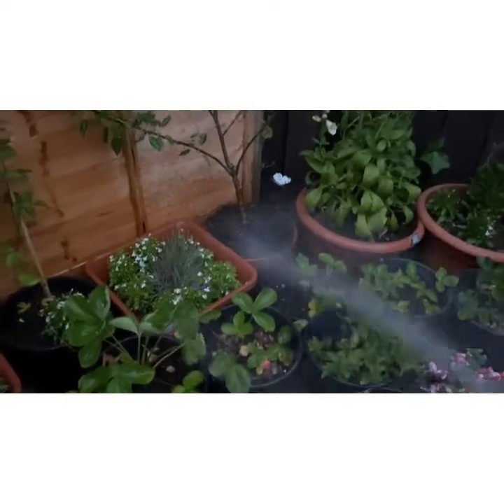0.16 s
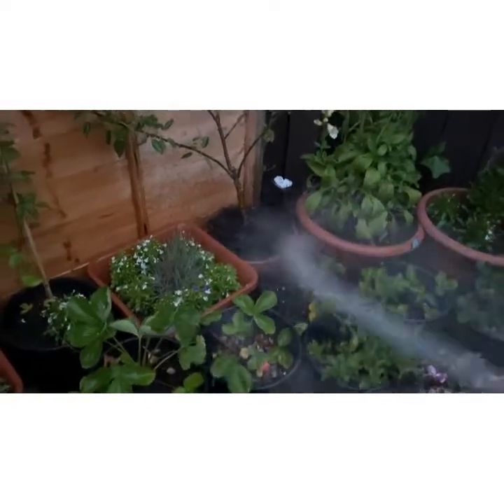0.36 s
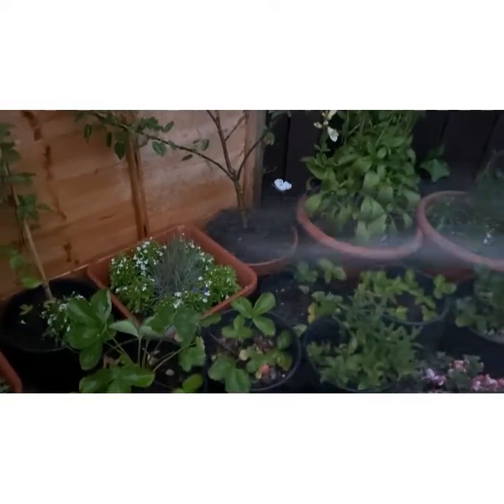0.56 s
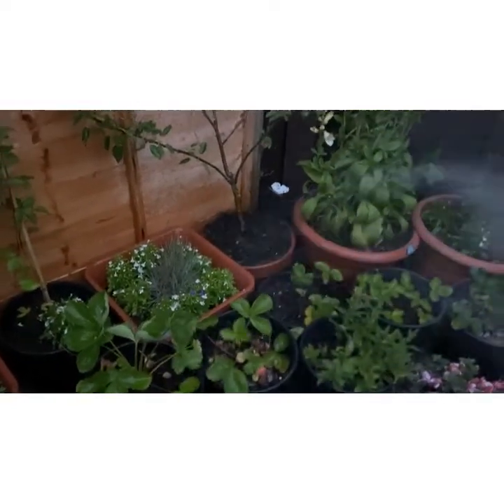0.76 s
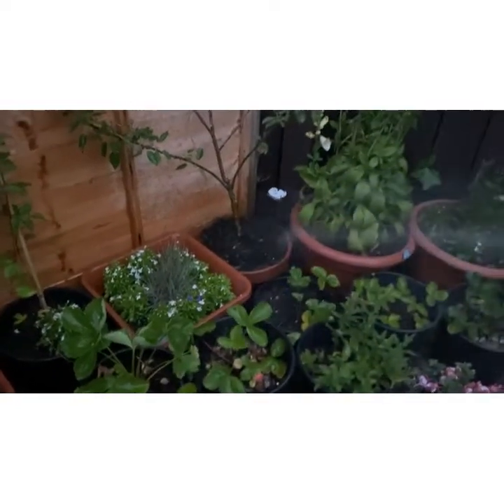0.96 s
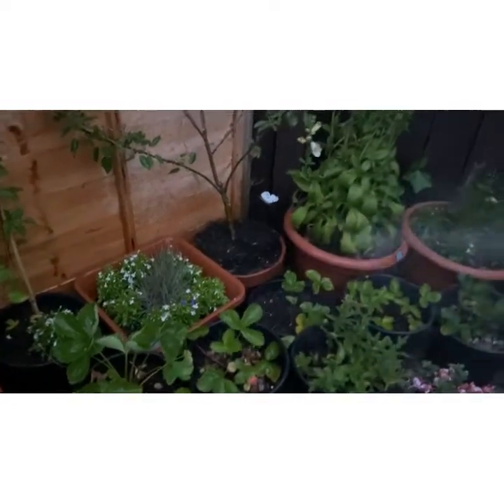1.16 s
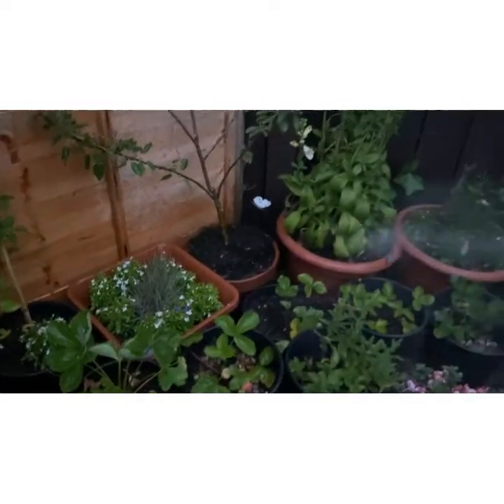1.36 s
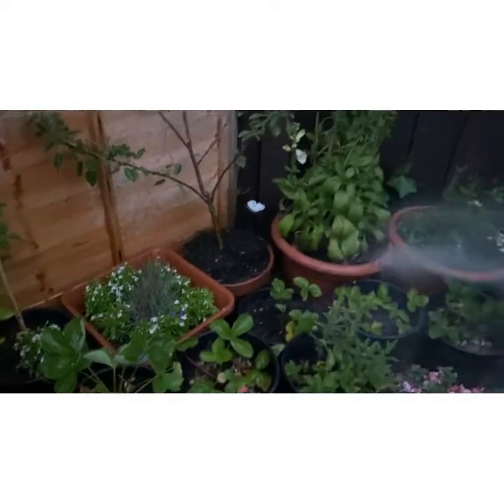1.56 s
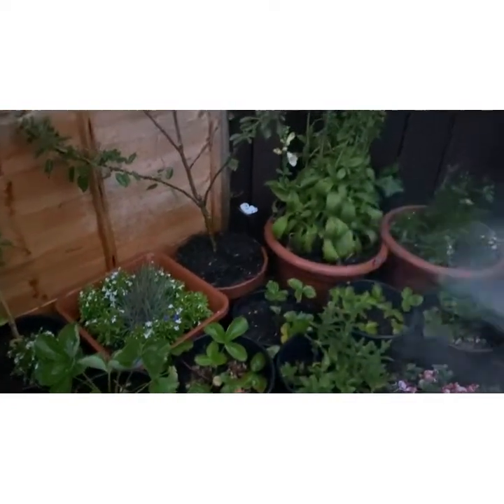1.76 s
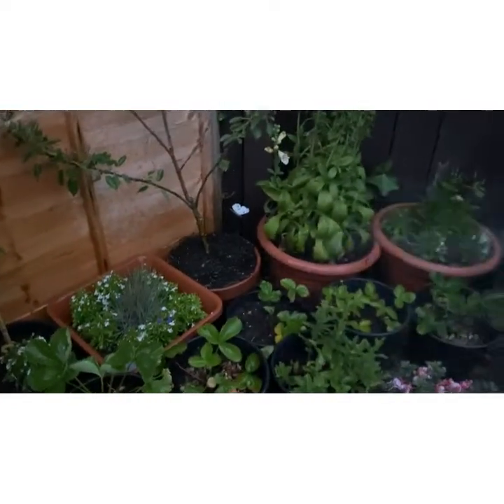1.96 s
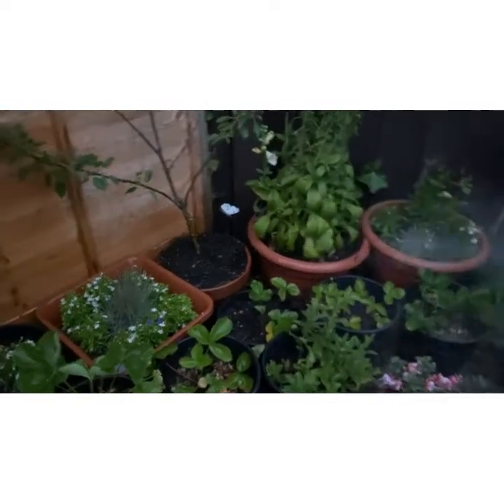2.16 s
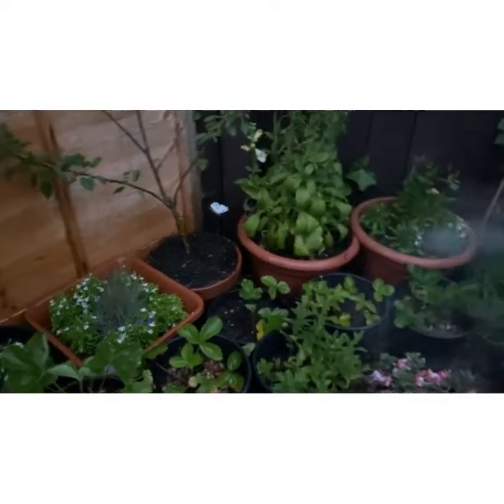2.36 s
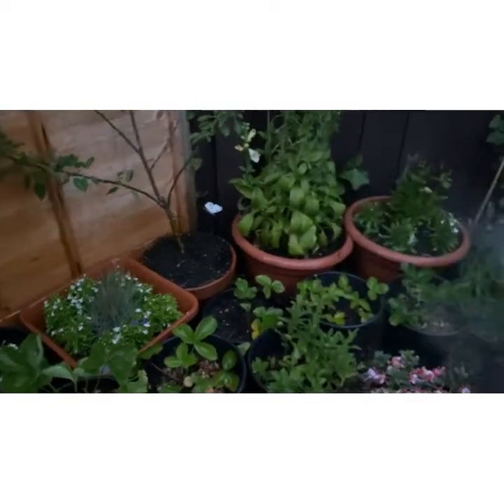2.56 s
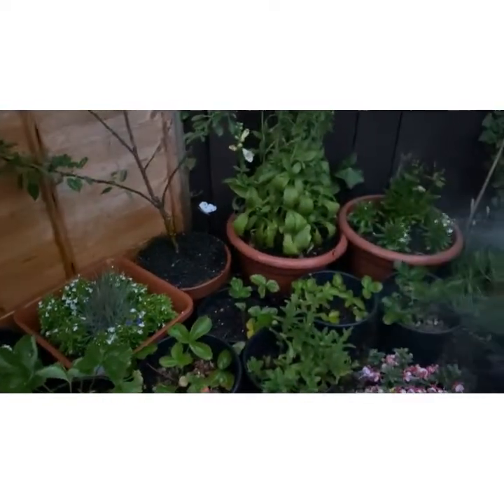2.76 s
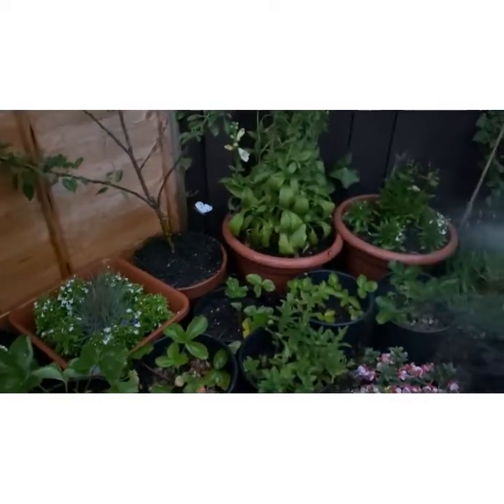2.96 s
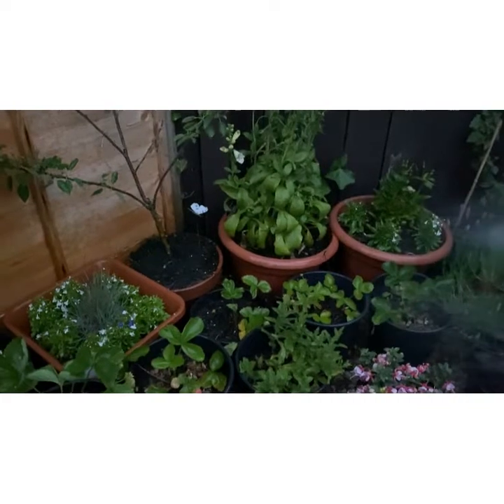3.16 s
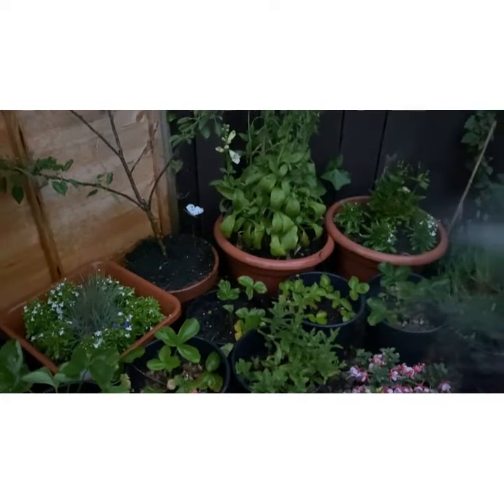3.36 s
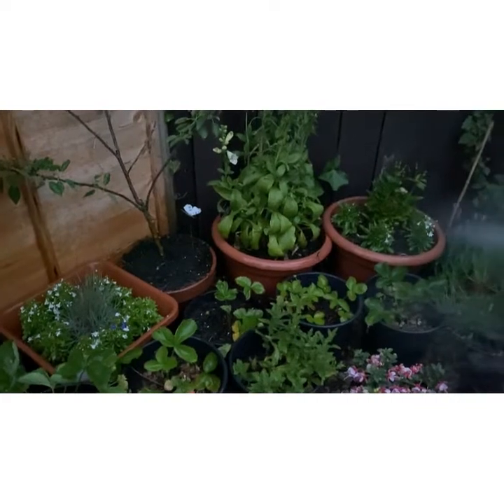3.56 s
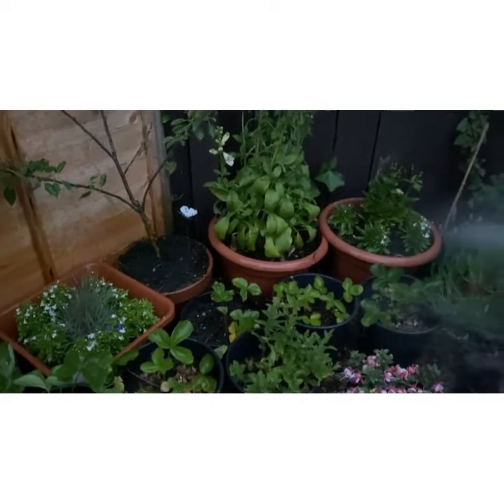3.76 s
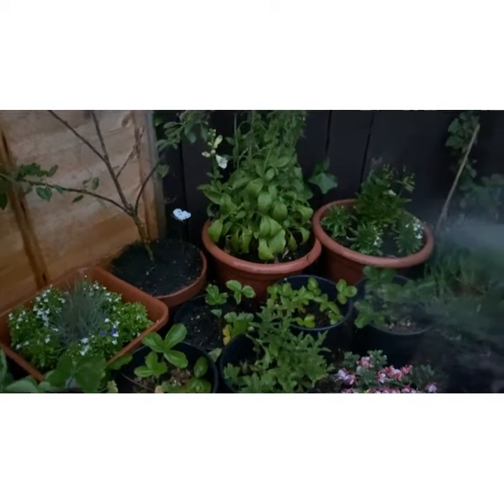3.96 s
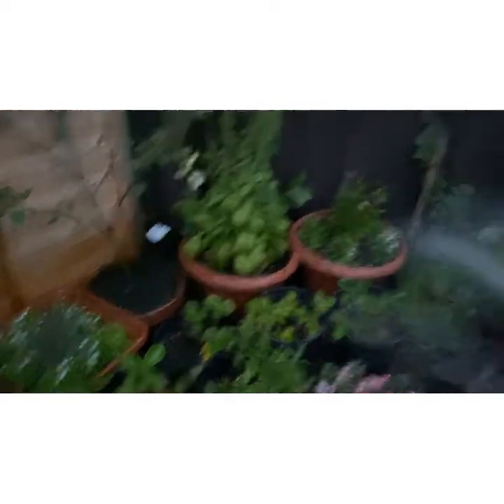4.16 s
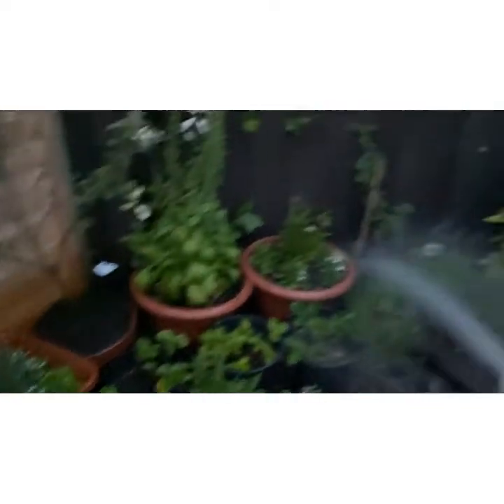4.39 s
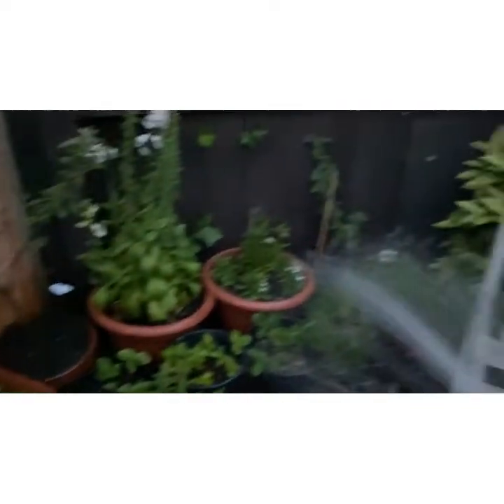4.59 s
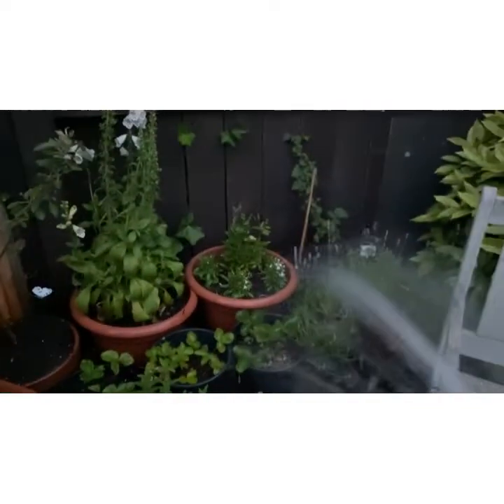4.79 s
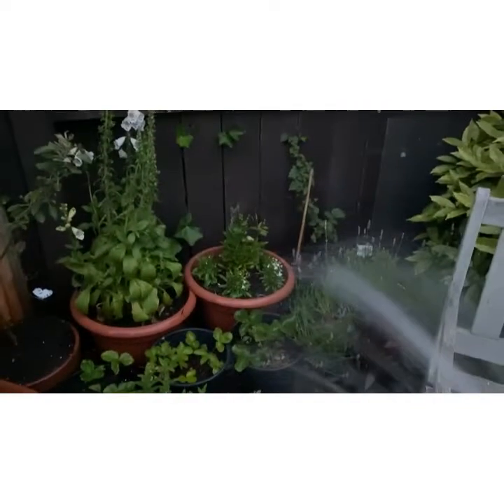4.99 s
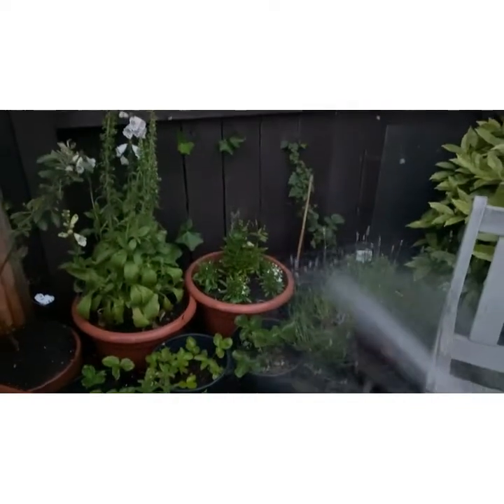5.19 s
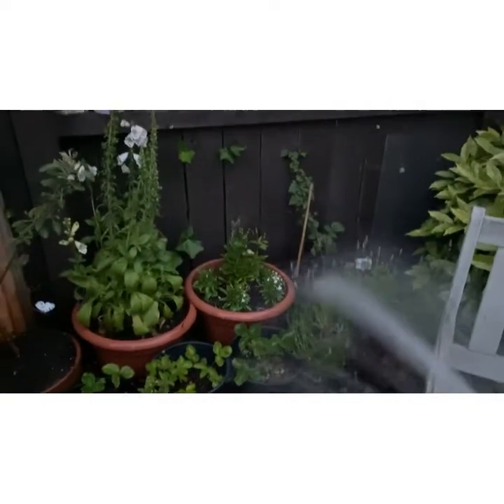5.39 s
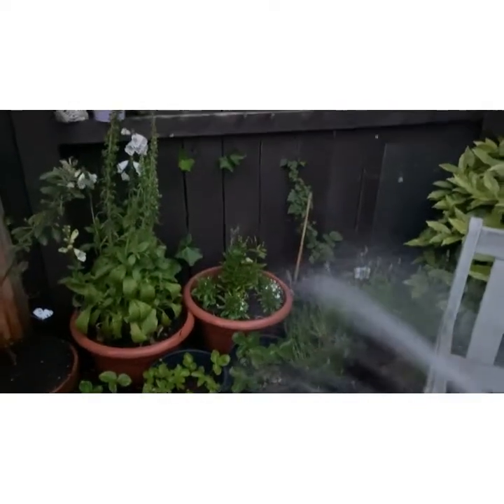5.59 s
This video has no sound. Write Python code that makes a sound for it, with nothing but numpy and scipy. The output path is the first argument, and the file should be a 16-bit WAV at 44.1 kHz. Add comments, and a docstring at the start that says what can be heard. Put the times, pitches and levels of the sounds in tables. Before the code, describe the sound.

In a fenced garden corner, heard from a handheld device near the spray, water hisses and patters on leaves and soil. Bright wet slaps pulse through the first two seconds, the middle is quieter and thinner with crisp ticking drops, and the last part turns hollow and ringing as the jet drums on pots. The water is still running at the end.

```python
"""In the corner of a wooden fence, a garden hose sprays potted plants, close to a phone.
Thousands of drops, made from random clicks shaped by filters, patter on leaves and thud on soil.
Fine mist hisses and sizzles; the jet, a dense shower that swells and fades, swishes across leaves.
Pots and a tub ring in narrow bands; single drops, each a short fading tone, plop, smack and tick.
Low rumble and a faint hum lie behind the water."""
import sys
import numpy as np
from scipy import signal
from scipy.fft import rfft, irfft, next_fast_len
from scipy.io import wavfile
from scipy.ndimage import uniform_filter1d, map_coordinates

SR = 44100
rng = np.random.default_rng(int(sys.argv[2]) if len(sys.argv) > 2 else 0)


def inscribe(sig):
    """Save sig as 16-bit PCM at rate SR to the path in sys.argv[1].

    A 1-D sig is mono; a 2-D sig holds one channel per row.
    Samples are clipped to [-1, 1] before scaling.
    """
    pcm = np.round(np.clip(np.atleast_2d(sig).T, -1, 1) * 32767)
    wavfile.write(sys.argv[1], SR, pcm.astype(np.int16))


N = 248283
T = np.arange(N) / SR
SIZE = next_fast_len(N + 8192)
FREQ = np.maximum(np.arange(SIZE // 2 + 1) * SR / SIZE, 1)


def undb(db):
    """Turn decibels into a gain."""
    return 10 ** (np.asarray(db) / 20)


def unit(x):
    """Scale a sound to rms 1."""
    return x / np.sqrt(np.mean(x ** 2))


def curve(rows):
    """Draw a (t/s, value) table as a line with a value at every sample."""
    return np.interp(T, *np.transpose(rows))


def spectrum(points):
    """Draw an (f/Hz, level/dB) table as a line over all frequencies, even in octaves."""
    hz, db = np.transpose(points)
    return np.interp(np.log(FREQ), np.log(hz), db)


def filtered(x, gain):
    """Multiply each frequency of a sound by its own gain."""
    return irfft(rfft(x, SIZE) * gain, SIZE)[..., :N]


def resonance(hz, width):
    """Response of one damped ringing mode, gain 1 at its centre."""
    return 1 / (1 + 1j * (FREQ / hz - hz / FREQ) * hz / width)


def walk(rate):
    """A wandering value of rms 1: random levels held for 1 / rate seconds, then smoothed."""
    held = rng.standard_normal(2048)[(T * rate).astype(int) % 2048]
    return unit(uniform_filter1d(held, max(int(SR / rate), 1)))


def swell(start, hold, rise, decay):
    """An envelope that swells up to a moment, holds and dies away."""
    before = np.maximum(start - T, 0)
    after = np.maximum(T - start - hold, 0)
    return np.exp(-(before / rise) ** 2 - after / decay)


def with_swells(steady_db, rows, rise, decay):
    """Gain of a steady level with (t/s, hold/s, level/dB) swells on top; their powers add."""
    swell_power = sum((undb(db) * swell(s, hold, rise, decay)) ** 2 for s, hold, db in rows)
    return np.sqrt(undb(steady_db) ** 2 + swell_power)


def add(out, start, sound):
    """Mix a short sound in at a time in seconds."""
    i = int(np.clip(start * SR, 0, N - 1))
    out[..., i:i + sound.shape[-1]] += sound[..., :N - i]


def drops(rate, spread_db):
    """Clicks at random moments, `rate` a second on average, with random sizes and signs."""
    lands = rng.random(N) < rate / SR
    size = undb(spread_db * np.clip(rng.standard_normal(N), -3, 2.6))
    return lands * size * rng.choice([-1, 1], N)


# how wide the spray sounds: f/Hz, side minus mid level/dB
SPRAY_WIDTH = [(60, -18), (200, -9.5), (700, -8), (1400, -2), (2400, -7), (4000, -8.5), (5500, -2.5),
               (7000, -20), (15000, -70)]


def shower(gain, rate, spread_db):
    """Drops all over a surface with this response, as left and right made from mid and side."""
    mid = unit(filtered(drops(rate, spread_db), gain))
    side = unit(filtered(drops(rate, spread_db), gain))
    return mid + np.array([[1], [-1]]) * filtered(side, undb(spectrum(SPRAY_WIDTH)))


def wavering(x, share, rate):
    """Let the pitch of a ringing sound wander by a small share, by reading it faster and slower."""
    place = np.arange(N) + np.cumsum(share * walk(rate))
    return np.array([map_coordinates(side, [place], order=1, mode="mirror") for side in x])


# a faint hum in the distance: start t/s, end t/s, f/Hz, level/dB
DISTANT_HUMS = [(2.998, 3.747, 119, -72.5)]


def hums():
    """A sine wave with a wavering pitch fades in and out: a faint hum from beyond the fence."""
    out = 0
    for start, end, hz, db in DISTANT_HUMS:
        fade = np.clip(np.minimum(T - start, end - T) / 0.12, 0, 1)
        phase = 2 * np.pi * np.cumsum(hz + walk(5.2)) / SR
        out = out + undb(db) * fade * np.sin(phase)
    return out


# colour of the rumble: f/Hz, level/dB
RUMBLE_TONE = [(18, -50), (30, -38), (42, -6), (52, 0.5), (75, 0), (110, 1.5), (170, -6), (350, -16),
               (1000, -48)]
# the phone is swung and stirs up rumble: t/s, hold/s, level/dB
PHONE_SWINGS = [(0.0, .58, -62.5), (1.63, .08, -69.5), (4.194, 1.6, -65)]
SWING_RISE_S, SWING_DECAY_S, STILL_RUMBLE_DB = 0.12, 0.29, -73.5


def rumble():
    """Air and handling rumble, nearly the same on both sides, stronger while the phone is swung."""
    force = with_swells(STILL_RUMBLE_DB, PHONE_SWINGS, SWING_RISE_S, SWING_DECAY_S)
    return shower(undb(spectrum(RUMBLE_TONE)), rate=7900, spread_db=6.0) * force


def bump(at_s, length_s, hz, db):
    """One soft, low bump: a sine wave that swells and fades in a bell shape."""
    return undb(db) * np.exp(-((T - at_s) / length_s) ** 2) * np.sin(2 * np.pi * hz * T)


# thin, high resonances: f/Hz, width/Hz before widening, relative level/dB
HIGH_MODES = [(4340, 140, -5.5), (4930, 320, -8)]
# strength of the high ring: t/s, level/dB
HIGH_RING_LEVEL = [(0.0, -62), (1.9, -68), (2.4, -60), (3.8, -68), (4.3, -60), (5.63, -58)]


def high_ring():
    """Drops excite two high resonances: a thin ring that comes and goes and is strongest at the end."""
    rings = 0
    for hz, width, db in HIGH_MODES:
        rings = rings + undb(db) * shower(resonance(hz, 1.8 * width) ** 2, rate=4000, spread_db=2)
    return unit(rings) * undb(curve(HIGH_RING_LEVEL))


# the jet drums on a deep tub, which booms softly: t/s, hold/s, level/dB before mixing, f/Hz
TUB_BOOMS = [(0.14, 0.084, -57, 313), (4.13, 0.24, -65.5, 317), (4.454, .05, -61, 311),
             (5.24, 0.23, -62.5, 317)]


def booms(width_hz, rise_s, decay_s):
    """A low, narrow resonance swells while the water falls into the tub."""
    out = 0
    for s, hold, db, hz in TUB_BOOMS:
        drumming = shower(resonance(hz, width_hz) ** 2, rate=2200, spread_db=3)
        out = out + undb(db) * swell(s, hold, rise_s, decay_s) * drumming
    return out


# heavy drops plop into soil and pots: t/s, level/dB before the fade, starting f/Hz
HEAVY_PLOPS = [(0.15, -52, 308), (0.195, -46, 735), (0.21, -52, 335), (0.383, -40, 816), (0.46, -51, 340),
               (0.542, -47, 780), (0.61, -41, 770), (0.702, -33, 794), (4.4545, -41, 1360),
               (4.6735, -35, 1410)]


def plops(attack_s, cycles, glide):
    """A heavy drop lands with a short, hollow note that rises slightly and dies within a few cycles."""
    out, t = np.zeros(N), T[:4096]
    for s, db, hz in HEAVY_PLOPS:
        age = t * hz / cycles
        envelope = (1 - np.exp(-t / attack_s)) * np.exp(-age)
        note = np.sin(2 * np.pi * hz * t * (1 + glide * np.minimum(age, 2)))
        add(out, s, undb(db) * envelope * note)
    return out


def crackle(rate, spread_db, burst_s):
    """Coarse droplets, each bursting into a brief fizz of noise."""
    impacts = drops(rate, spread_db) ** 2 + 1e-18
    energy = signal.lfilter([1], [1, -np.exp(-1 / (burst_s * SR))], impacts)
    return np.sqrt(energy) * rng.standard_normal(N)


# fine mist hanging near the phone: t/s, level/dB before the fine and coarse parts are weighted
MIST_LEVEL = [(0.0, -52.5), (1.0, -56), (2.05, -57.5), (2.66, -59.5), (2.74, -54.5), (3.15, -54),
              (3.5, -49.5), (5.35, -59.5), (5.63, -52.5)]
# colour of mist and of drops close by: f/Hz, level/dB
MIST_TONE = [(2500, -14), (5000, -7), (7000, 0), (10000, 2), (11700, 3.5), (15500, 3.5)]
# puffs of spray thrown close by: t/s, hold/s, fine mist level/dB, coarse sizzle level/dB
SPRAY_PUFFS = [(0.0, .19, -45.5, -46.5), (0.414, 0.12, -45.5, -49), (0.714, 0.066, -52, -54),
               (0.842, 0.018, -49.5, -53), (0.928, 0.013, -47.5, -63), (1.17, .015, -54, -61),
               (2.853, 0.017, -60, -61), (3.474, 0.011, -63, -55), (4.882, 0.015, -54, -63)]
PUFF_RISE_S, PUFF_DECAY_S = 0.024, 0.021


def mist():
    """Fine droplets hiss in small gusts and puffs; larger ones crackle among them."""
    colour = undb(spectrum(MIST_TONE))
    fine = undb(3.0) * shower(colour, rate=14000, spread_db=5.5)
    fizz = crackle(rate=480, spread_db=5.2, burst_s=.0009)
    coarse = undb(-1.4) * unit(filtered(fizz, colour))
    puffs = [(s, hold, db) for s, hold, db, _ in SPRAY_PUFFS]
    force = with_swells(curve(MIST_LEVEL), puffs, PUFF_RISE_S, PUFF_DECAY_S)
    gusts = undb(1.93 * walk(76))
    return (fine + coarse) * force * gusts


# colour of the sizzle on leaves: f/Hz, level/dB
SIZZLE_TONE = [(1200, -4), (2500, -7), (4200, -4.5), (5500, 2), (7300, 2), (9000, -5), (12000, 4.5),
               (15500, -30)]
# how hard the water falls on the plants; drives sizzle, soil, pots and leaves: t/s, level/dB
WATER_FLOW = [(0.0, -44), (0.19, -45), (0.23, -45), (0.32, -44.5), (0.36, -46.5), (0.39, -44),
              (0.53, -44.5), (0.57, -47.5), (0.63, -43.5), (0.8, -43.5), (0.92, -45), (1.35, -46.5),
              (1.8, -48), (2.0, -48), (2.3, -49), (2.42, -51), (2.52, -51), (2.7, -50), (3.3, -50),
              (3.7, -48.5), (4.05, -49), (4.6, -49.5), (5.25, -50.5), (5.63, -50.5)]
# share of the flow that each surface always gets
SOIL_SHARE_DB, POT_SHARE_DB, SIZZLE_SHARE_DB = -11.5, -14.5, -12.5


def sizzle():
    """Small droplets sizzle on near leaves, with the flow and in every puff."""
    puffs = [(s, hold, db) for s, hold, _, db in SPRAY_PUFFS]
    force = with_swells(curve(WATER_FLOW) + SIZZLE_SHARE_DB, puffs, PUFF_RISE_S, PUFF_DECAY_S)
    return shower(undb(spectrum(SIZZLE_TONE)), rate=8200, spread_db=-0.5) * force


# stray drops close by: t/s, level/dB before gain and colour, f/Hz
STRAY_TICKS = [(0.2244, -28.5, 11800), (0.564, -30, 15100), (0.837, -44, 11000), (1.1448, -40, 6340),
               (2.7027, -32, 14800), (2.8574, -34, 10400), (2.8759, -34, 15300), (2.93, -35, 15500),
               (2.9801, -34, 15300), (3.027, -38, 14900), (3.3223, -38, 15500), (3.3485, -34, 15200),
               (3.454, -40, 10200), (3.477, -33, 6800), (3.5523, -42, 11700), (3.756, -36, 7340),
               (3.894, -38, 11800), (4.6513, -39, 15400), (4.7895, -46, 15000), (4.871, -38, 12000),
               (5.3717, -35.5, 7650), (5.385, -36, 15300), (5.4959, -35, 15100), (5.5646, -34, 7100)]


def stray_drops(snap_s, splash_s, splash_db, gain_db):
    """A lone drop snaps on a near leaf, a rough fading tone, and scatters a little noisy spatter."""
    out, t = np.zeros(N), T[:2048]
    for s, db, hz in STRAY_TICKS:
        roughness = 0.35 * np.cumsum(rng.standard_normal(len(t)))
        snap = np.exp(-t / snap_s) * np.sin(2 * np.pi * hz * t + roughness)
        spatter = undb(splash_db) * np.exp(-t / splash_s) * rng.laplace(size=len(t))
        add(out, s, undb(db + gain_db) * (snap + spatter))
    return filtered(out, undb(spectrum(MIST_TONE)))


# colour of drops on soil: f/Hz, level/dB
SOIL_TONE = [(40, -32), (100, -2.5), (190, -4), (260, -0.5), (325, -6.5), (400, 1.5), (520, -10),
             (1200, -12.5)]
# the jet dwells on a pot: t/s, hold/s, thud of the soil level/dB, drumming of the pot level/dB
POT_DWELLS = [(0.104, 0.1, -50.5, -50.5), (0.313, 0.017, -53.5, -51), (0.45, 0.52, -64, -73),
              (2.2, 0.74, -60, -67), (3.8, 0.5, -63, -67), (4.297, 1.8, -63.5, -67)]
DWELL_RISE_S, DWELL_DECAY_S = 0.083, 0.056


def soil():
    """Heavy drops thud dully into the compost, harder where the jet dwells."""
    dwells = [(s, hold, db) for s, hold, db, _ in POT_DWELLS]
    force = with_swells(curve(WATER_FLOW) + SOIL_SHARE_DB, dwells, DWELL_RISE_S, DWELL_DECAY_S)
    thuds = shower(undb(spectrum(SOIL_TONE)), rate=1500, spread_db=5.0)
    return thuds * force * undb(0.26 * walk(20) - 2.3)


# resonances of the wet pots: f/Hz, width/Hz before the response is sharpened, relative level/dB
WET_POT_MODES = [(870, 170, -13), (1364, 102, -3.5), (1427, 240, -5), (1798, 76, -6.5), (2000, 130, -17)]


def pots():
    """Drops drum in the pots; each cavity shifts in pitch and strength as the jet wavers over it."""
    rings = 0
    for hz, width, db in WET_POT_MODES:
        drumming = shower(resonance(hz, width) ** 1.18, rate=4300, spread_db=3.5)
        rings = rings + wavering(drumming, share=.011, rate=9) * undb(db + 0.5 * walk(15))
    dwells = [(s, hold, db) for s, hold, _, db in POT_DWELLS]
    force = with_swells(curve(WATER_FLOW) + POT_SHARE_DB, dwells, DWELL_RISE_S, DWELL_DECAY_S)
    return unit(rings) * force


# hollow pots on which the jet settles at last: f/Hz, width/Hz before widening, relative level/dB
HOLLOW_POT_MODES = [(870, 320, -0.5), (1277, 104, -2.5), (1420, 99, 0), (1780, 130, 0.5), (1932, 45, -7),
                    (2030, 74, -6), (2700, 170, -7), (2950, 220, -22), (3370, 380, -1)]
# strength of their drumming: t/s, level/dB
HOLLOW_LEVEL = [(3.6, -87), (4.05, -61), (4.3, -54), (4.5, -53), (4.65, -54), (4.85, -52.5), (5.15, -54),
                (5.3, -53), (5.63, -53.5)]


def hollow_pots():
    """The jet settles on hollow pots; they drum in narrow bands that waver and swell by turns."""
    rings = 0
    for hz, width, db in HOLLOW_POT_MODES:
        drumming = shower(resonance(hz, 1.34 * width) ** 2, rate=4000, spread_db=2.5)
        rings = rings + wavering(drumming, share=.008, rate=7) * undb(db + 1.1 * walk(7.6))
    return unit(rings) * undb(curve(HOLLOW_LEVEL))


def plinks(low_hz, high_hz, cycles, glide, spread_db, count):
    """Tiny bubbles in the water ring for some cycles and rise in pitch, scattered left and right."""
    out, t = np.zeros((2, N)), T[:1024]
    for when, pitch, size, place in rng.random((count, 4)):
        hz = low_hz * (high_hz / low_hz) ** pitch
        age = t * hz / cycles
        ring = np.exp(-age) * np.sin(2 * np.pi * hz * t * (1 + glide * np.minimum(age, 2)))
        both_sides = np.outer([place + .5, 1.5 - place], ring)
        add(out, when * N / SR, both_sides * undb(spread_db * size ** 2))
    return unit(out)


# colour of drops on leaves: f/Hz, level/dB
LEAF_TONE = [(200, -15.5), (480, -10), (800, 2.5), (1400, -2), (2400, 0.5), (3400, 0.5), (5200, -8),
             (7500, -5.5), (11000, -18)]


def foliage():
    """Dense patter and bubbles on wet leaves; the harder the flow, the more fat drops stand out."""
    flow = curve(WATER_FLOW)
    leaf = undb(spectrum(LEAF_TONE))
    patter = undb(-1.5) * shower(leaf, rate=12000, spread_db=1.5)
    fat = undb(-6.5 + .7 * (flow - flow.max())) * shower(leaf, rate=550, spread_db=2)
    bubbles = plinks(low_hz=1102, high_hz=4420, cycles=32, glide=0.015, spread_db=8, count=1900)
    return (patter + fat + undb(-10.5) * bubbles) * undb(flow + 0.33 * walk(30))


# fat drops smack a broad leaf inside a swish: t/s, level/dB before gain, f/Hz
LEAF_SMACKS = [(0.7226, -25, 3480), (0.7418, -30, 2630), (0.836, -28, 2580), (0.8454, -36, 2980),
               (0.863, -29, 2980), (0.9716, -26, 2320), (0.9846, -29, 2410), (1.1613, -27, 2480),
               (1.373, -28, 2480), (1.5873, -20, 3040), (1.5918, -28, 1920), (1.6134, -28, 2820),
               (1.6306, -26, 2150), (1.886, -30, 2890), (1.902, -30, 2660)]
# colour of the jet and of the smacks' spatter: f/Hz, level/dB
SWISH_TONE = [(150, -17), (420, -12.5), (700, -0.5), (1000, -2), (1220, 4), (1420, 0), (1750, -1),
              (2150, -0.5), (2900, 0), (3450, -2), (3750, -3.5), (4400, -7), (5300, -13), (7800, -9),
              (10000, -15.5), (14000, -15)]


def smacks(ring_s, spatter_s, spatter_db, gain_db):
    """A fat drop cracks on a leaf, which rings for an instant, and bursts into noisy spatter."""
    knocks, spatter, t = np.zeros(N), np.zeros(N), T[:1024]
    for s, db, hz in LEAF_SMACKS:
        add(knocks, s, undb(db) * np.exp(-t / ring_s) * np.sin(2 * np.pi * hz * t))
        add(spatter, s, undb(db) * np.exp(-t / spatter_s) * rng.standard_normal(len(t)))
    coloured = filtered(spatter, undb(spectrum(SWISH_TONE)))
    return undb(gain_db) * (knocks + undb(spatter_db) * coloured)


# the jet crosses broad leaves and pots: t/s, level/dB before tone changes, rise/s, hold/s, decay/s,
# ring f/Hz, ring level/dB, body level/dB, bright splash level/dB
JET_SWISHES = [(0.29, -46, 0.026, 0.035, 0.017, 1406, 15, -4, -16),
               (0.605, -43.5, 0.013, 0.014, 0.02, 2300, 7, -9, -8),
               (0.721, -37.5, 0.027, .006, 0.038, 3370, 9, -2, 3),
               (0.856, -37.5, 0.018, 0.013, 0.033, 2910, 8, -1.5, -2),
               (0.971, -34, 0.013, .009, 0.014, 2470, 4, -4, -5),
               (1.159, -36.5, .016, 0.011, 0.022, 2540, 10, -2, -5.5),
               (1.373, -39, 0.012, 0.0096, 0.027, 2500, 9, -2.5, -0.5),
               (1.589, -41, 0.003, 0.008, 0.0083, 1990, 2, -4, -7),
               (1.611, -39.5, 0.022, 0.022, 0.036, 3020, 6, 0.5, 0),
               (1.881, -36.5, 0.011, 0.016, 0.035, 2520, 6, -2.5, -3),
               (2.345, -50.5, 0.028, 0.025, 0.03, 2300, -2, -5, 4),
               (2.582, -53, 0.016, 0.028, 0.029, 1900, -6, 3, 5),
               (4.573, -59, .02, .16, .04, 1715, 22, -9, 2),
               (4.58, -59.5, 0.03, 0.17, 0.037, 1330, 21, -6, -6),
               (5.322, -56.5, .015, 0.06, .03, 2000, 14, -2, -10),
               (5.35, -62, .02, .03, .03, 1390, 17, -3, -9), (5.56, -55, .03, 0.066, .03, 1400, 9, -17, -6)]
SWISH_RING_WIDTH_HZ = 69


def swishes(body_hz, splash_hz, ripple_db):
    """The jet slaps a broad surface, swells and trails off; each surface has its own fine resonances."""
    spray = shower(undb(spectrum(SWISH_TONE)), rate=8000, spread_db=1.5)
    out = 0
    for s, db, rise, hold, decay, ring_hz, ring_db, low_db, bright_db in JET_SWISHES:
        before = np.maximum(s - T, 0)
        after = np.maximum(T - s - hold, 0)
        force = undb(db) * np.exp(-before / rise - after / decay)
        ring = ring_db * np.abs(resonance(ring_hz, SWISH_RING_WIDTH_HZ)) ** 2
        body = low_db / (1 + (FREQ / body_hz) ** 6)
        splash = bright_db / (1 + (splash_hz / FREQ) ** 8)
        ripple = ripple_db * np.interp(FREQ, np.linspace(0, SR / 2, 256), rng.standard_normal(256))
        out = out + force * filtered(spray, undb(ring + body + splash + ripple))
    return out


# in mid sweep the spray sounds thin below an edge that climbs and glides back down:
# t/s, edge f/Hz, change below the edge level/dB
THINNING = [(0.86, 20, -2), (1.0, 310, -10), (1.12, 640, -9.5), (1.42, 1100, -5.5), (1.95, 1510, -4.5),
            (2.4, 1670, -3), (3.38, 1780, -3), (3.47, 1300, -5.5), (3.57, 850, -8), (3.7, 480, -7),
            (3.82, 230, -16), (3.92, 20, -8)]


def thinned(x, slope_db, ridge_db, order):
    """Lower the sound under the moving edge, a bit more over the next octave; add a ridge at the edge."""
    hz, s, z = signal.stft(x, SR, nperseg=1024, noverlap=768)
    when, edge_hz, depth_db = np.transpose(THINNING)
    edge = np.maximum(np.interp(s, when, edge_hz), 1)
    octaves = np.log2(np.maximum(hz[:, None], 1) / edge)  # above the edge
    below = 1 / (1 + 2 ** (order * octaves))
    ridge = np.exp(-((octaves - .2) / .2) ** 2)
    slope = slope_db * np.clip(-octaves, 0, 1)
    db = np.interp(s, when, depth_db) * below + slope + ridge_db * ridge
    return signal.istft(z * undb(db), SR, nperseg=1024, noverlap=768)[1][:, :N]


# peaks and dips of the fenced corner and its pots: f/Hz, width/Hz, level/dB
CORNER_MODES = [(309, 45, 4.5), (780, 106, -3), (1080, 133, -4), (1470, 520, -1.12), (1644, 57, -3),
                (1870, 23, 3), (2460, 83, 1), (3180, 89, -1.9), (3700, 61, -1.5)]
# balance between the sides: f/Hz, left minus right level/dB
SIDE_LEAN = [(60, 0), (110, 1), (200, 1), (380, 1), (700, -0.5), (1290, -1), (2380, 3), (4400, 3),
             (8120, 2), (15000, 0)]


def scene():
    """Add up the water and rumble, colour them by the corner, then add the hum and the bump."""
    water = high_ring() + mist() + sizzle() + soil() + pots() + hollow_pots() + foliage()
    water = water + smacks(ring_s=.0007, spatter_s=.002, spatter_db=-2, gain_db=-6)
    water = water + swishes(body_hz=1350, splash_hz=3870, ripple_db=1.5)
    water = thinned(water, slope_db=-1.0, ridge_db=1.0, order=24)
    water = water + booms(width_hz=25, rise_s=.025, decay_s=0.035) * undb(-9)
    water = water + plops(attack_s=0.001, cycles=4.1, glide=0.0075)
    water = water + stray_drops(snap_s=.0008, splash_s=.009, splash_db=-18, gain_db=1)
    corner_db = sum(db * np.exp(-((FREQ - hz) / width) ** 2) for hz, width, db in CORNER_MODES)
    lean_db = np.array([[.5], [-.5]]) * spectrum(SIDE_LEAN)
    garden = filtered(water + rumble(), undb(corner_db + lean_db))
    return garden + hums() + bump(at_s=4.545, length_s=0.019, hz=133.0, db=-53.0)


TREBLE_SPLIT_HZ, TREBLE_LAG_S, TOP_HZ = 6950, .000238, 15800


def record(dry):
    """The phone's stereo delays the left high treble a little and cuts the top; the deepest bass is taken out
    as well."""
    lag = np.exp(-2j * np.pi * np.maximum(FREQ - TREBLE_SPLIT_HZ, 0) * TREBLE_LAG_S)
    wide = np.array([filtered(dry[0], lag), dry[1]])
    bass_cut = signal.butter(4, 36, "highpass", fs=SR, output="sos")
    top_cut = signal.ellip(12, .1, 70, TOP_HZ, fs=SR, output="sos")
    return signal.sosfilt(top_cut, signal.sosfilt(bass_cut, wide))


dry = scene()
out = record(dry)
inscribe(out)
```